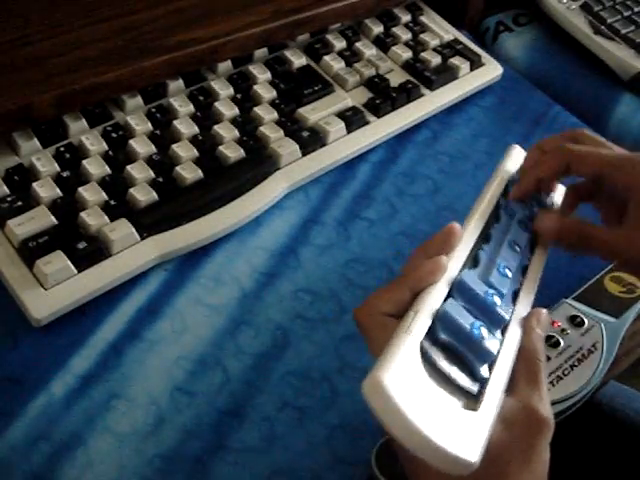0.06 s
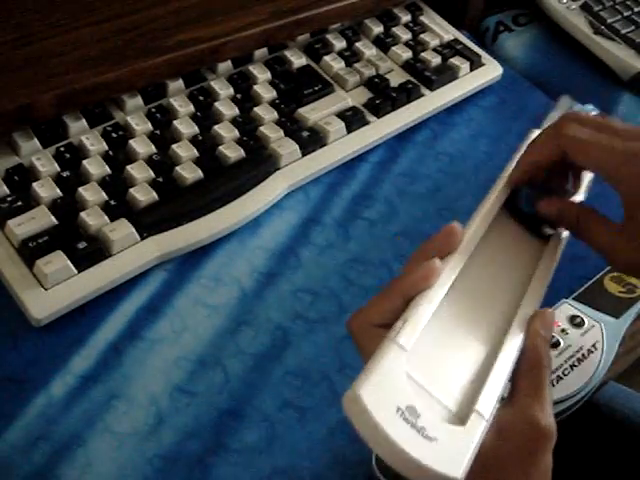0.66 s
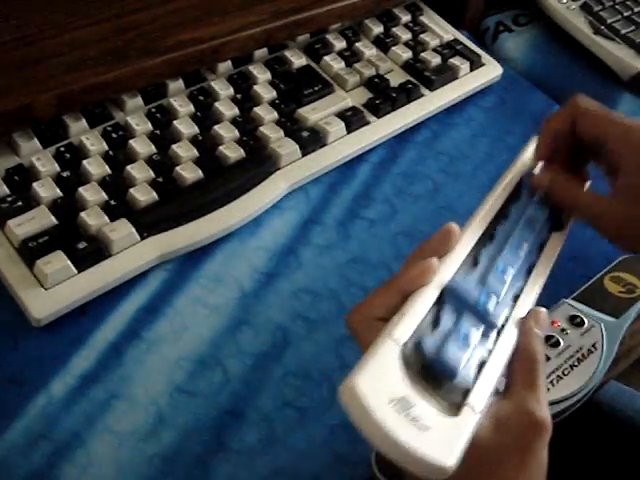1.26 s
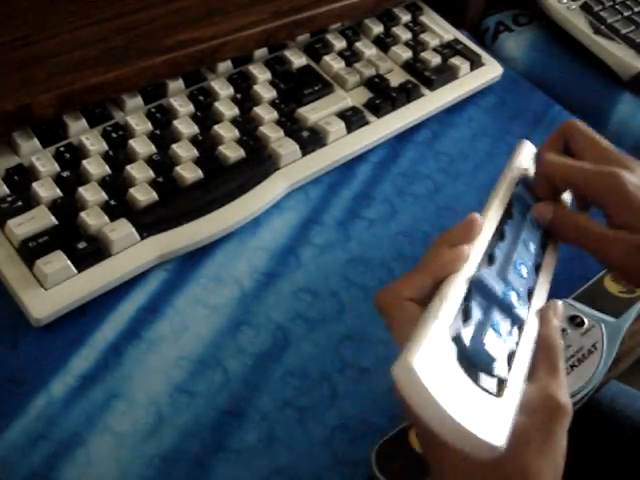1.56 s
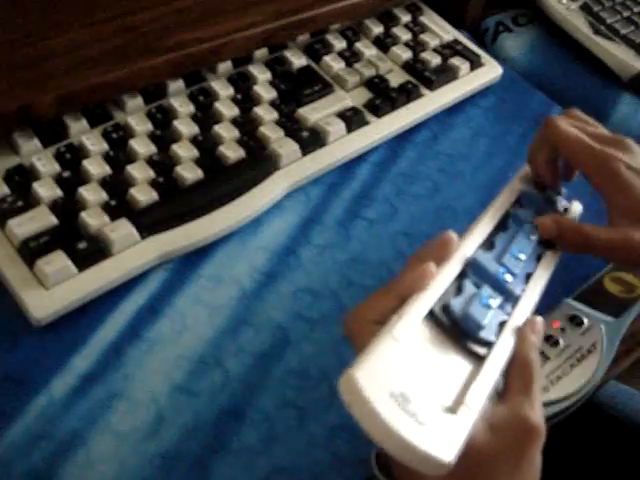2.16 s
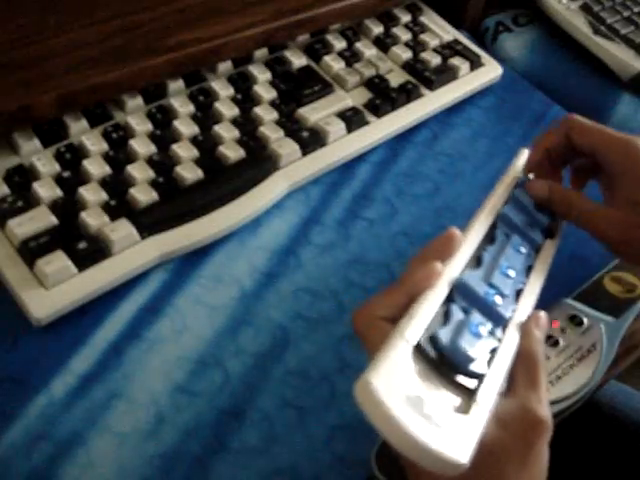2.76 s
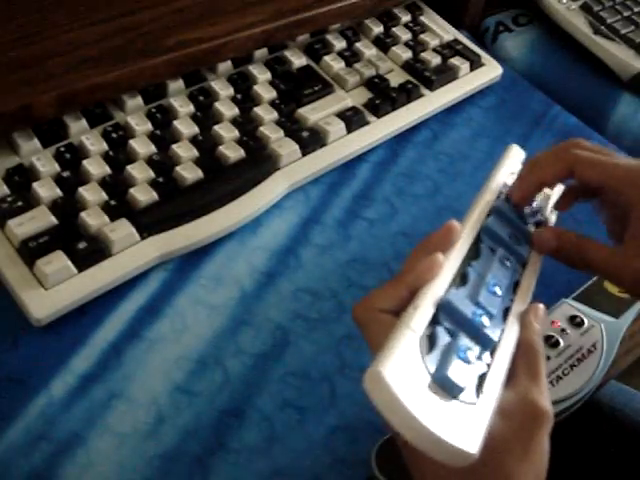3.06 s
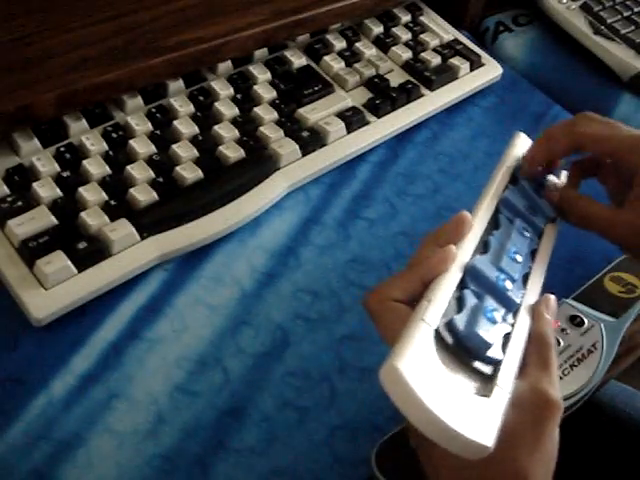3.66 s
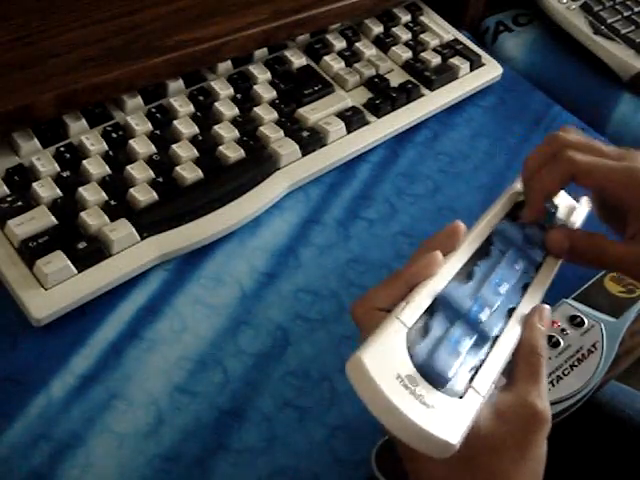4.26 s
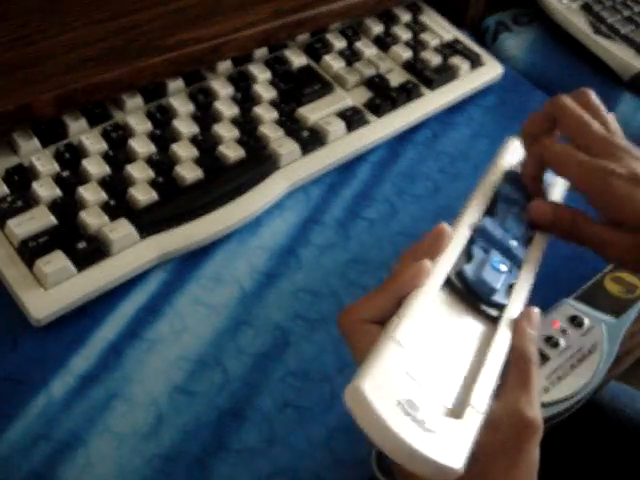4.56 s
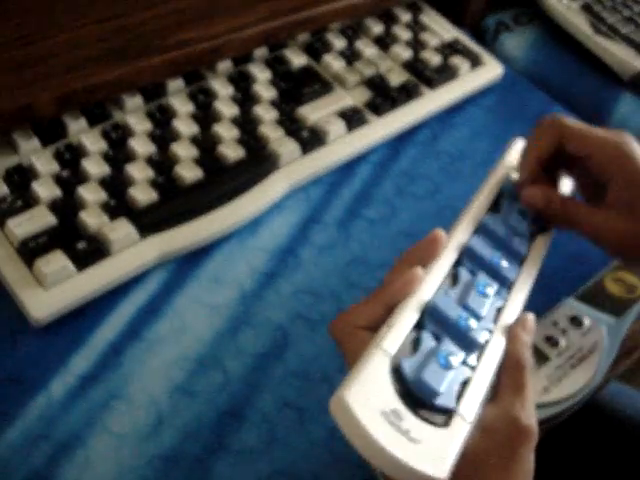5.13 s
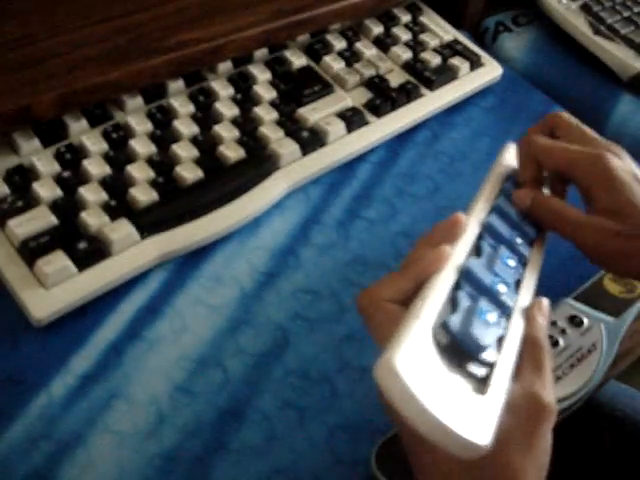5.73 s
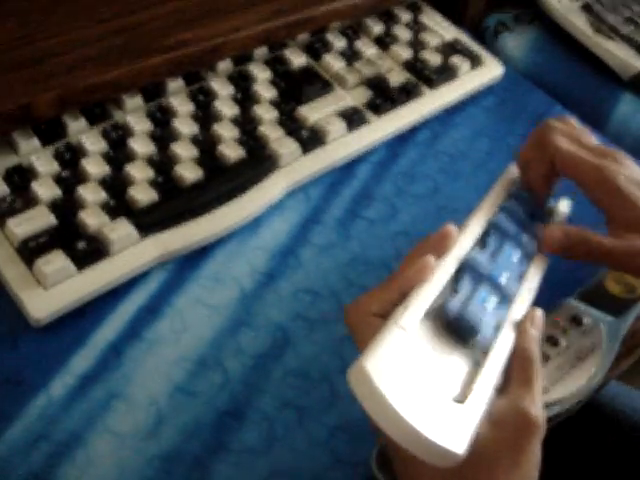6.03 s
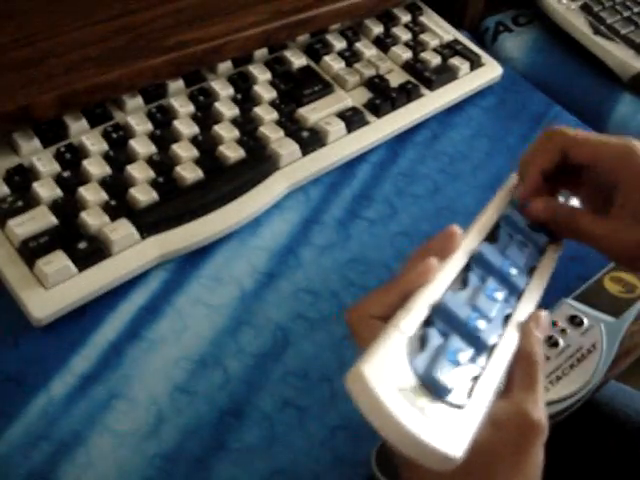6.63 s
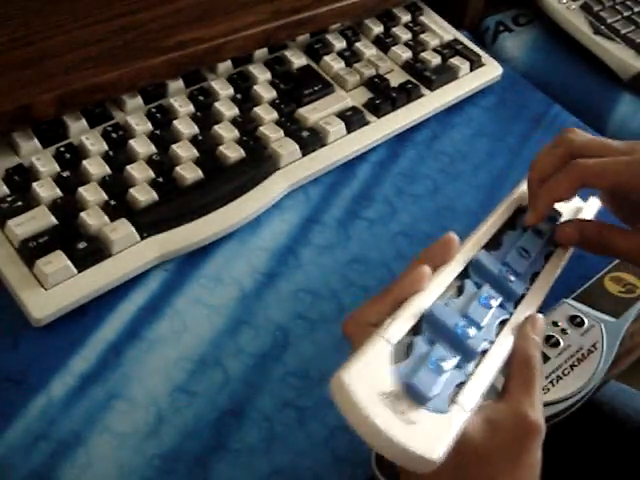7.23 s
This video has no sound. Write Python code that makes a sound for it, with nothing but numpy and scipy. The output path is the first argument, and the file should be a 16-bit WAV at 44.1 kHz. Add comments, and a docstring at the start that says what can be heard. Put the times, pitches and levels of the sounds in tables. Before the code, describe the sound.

A plastic sliding puzzle is worked by hand, close by in a small room, for about seven and a half seconds. Its knobs make quick, irregular clicks, each with a brief, fairly high, slightly hollow ring. The carrier rubs softly along its rails and strikes its end stops with harder, brighter clacks, slightly squashed and each carrying a small low thump.

Clicks and clacks start at once, with a short scrape near 0.8 seconds and further clacks around 1.2, 1.7 and from 2.2 to 2.9. From 3 to 4 seconds the clicking is lighter and sparser. A scrape and a loud cluster of clacks follow from 4.2 to 4.5. Busy clicking continues, with strong hits around 5.9 to 6.2, at 6.6 and near 7, and small clicks to the end. A short room echo trails the knocks, over faint low rumble, hiss and electric hum.

```python
"""At a desk in a small room, hands turn knobs and slide their carrier to and fro in a plastic puzzle case.
Each knock makes the case ring briefly. The carrier rubs along its rails and clacks against its end stops.
The room rings on behind it, over a low rumble, hiss and hum. A limiter (a fast automatic volume control)
squashes the hard clacks, so their tails stand out more; a low thump comes with each end-stop clack."""
import sys
import numpy as np
from scipy import signal
from scipy.fft import rfft
from scipy.io import wavfile
from scipy.ndimage import uniform_filter1d

SR = 44100
rng = np.random.default_rng(int(sys.argv[2]) if len(sys.argv) > 2 else 0)


def store_wav(level_fs):
    """Save 16-bit WAV to argv[1]."""
    pcm = np.round(np.clip(np.atleast_2d(level_fs), -1, 1) * 32767)
    wavfile.write(sys.argv[1], SR, pcm.T.astype(np.int16))


N = 325899

# Knobs and carrier knocking on the case. Each row: start in seconds, level in dB, ringing pitch in Hz,
# hollowness in dB (how far the middle pitches stand out), seconds to fade by 60 dB.
CLICKS = [(0.045, -36.5, 2430, 2, 0.032), (0.136, -27.0, 2520, 5, 0.059), (0.151, -24.5, 2540, 6, 0.042),
          (0.184, -20.0, 1720, -2, 0.035), (0.326, -18.0, 2570, 17, 0.031), (0.332, -16.0, 2520, 13, 0.017),
          (0.348, -25.5, 2480, 4, 0.036), (0.379, -22.0, 3100, 0, 0.02), (0.419, -23.0, 3100, -1, 0.05),
          (0.466, -30.5, 2520, 2, 0.049), (0.525, -29.5, 2520, 6, 0.031), (0.5604, -25.5, 2520, 4, 0.089),
          (0.575, -19.0, 2620, 2, 0.061), (0.612, -31.5, 2380, 2, 0.09), (0.629, -29.5, 4040, 5, 0.023),
          (0.7024, -23.0, 2440, 4, 0.049), (0.797, -20.5, 2220, 0, 0.025), (0.803, -25.5, 2190, 0, 0.034),
          (0.8225, -14.5, 3140, 3, 0.035), (0.833, -20.0, 2250, 15, 0.015), (0.839, -19.5, 3750, 1, 0.037),
          (0.862, -19.5, 3110, 1, 0.065), (0.881, -27.5, 3850, 1, 0.05), (1.0, -15.0, 2630, 2, 0.038),
          (1.028, -21.0, 2490, 4, 0.081), (1.08, -27.5, 3140, 3, 0.034), (1.2985, -17.0, 2530, 14, 0.042),
          (1.3414, -16.5, 2210, 4, 0.046), (1.499, -25.5, 2600, 2, 0.05), (1.557, -31.5, 2610, 4, 0.048),
          (1.595, -27.5, 2530, 4, 0.051), (1.63, -33.5, 2560, 5, 0.08), (1.944, -39.5, 1800, -3, 0.023),
          (2.0315, -21.5, 1920, 6, 0.025), (2.041, -23.0, 2560, 11, 0.017), (2.059, -19.0, 2530, 3, 0.043),
          (2.087, -23.0, 2390, 1, 0.063), (2.13, -21.5, 2470, 6, 0.029), (2.1369, -15.5, 2490, 15, 0.02),
          (2.35, -23.5, 1230, -1, 0.033), (2.357, -23.5, 2520, 0, 0.048), (2.491, -20.0, 1990, 6, 0.037),
          (2.583, -33.0, 1720, 3, 0.084), (2.611, -23.5, 2420, 12, 0.069), (2.7185, -22.5, 2550, 5, 0.026),
          (2.779, -19.5, 2950, 1, 0.012), (2.993, -33.0, 1730, -1, 0.05), (3.128, -20.5, 2260, 3, 0.079),
          (3.132, -18.5, 2310, 1, 0.039), (3.167, -27.5, 1750, -1, 0.045), (3.32, -34.0, 1800, -1, 0.025),
          (3.351, -27.0, 1820, -3, 0.02), (3.432, -30.0, 1990, 4, 0.028), (3.453, -30.5, 2260, 14, 0.025),
          (3.465, -33.0, 2540, 9, 0.031), (3.627, -26.5, 2490, 9, 0.042), (3.6765, -24.5, 2520, 7, 0.035),
          (3.699, -32.0, 2570, 15, 0.041), (3.729, -23.5, 2220, 3, 0.1), (3.993, -27.5, 2440, 2, 0.047),
          (4.0825, -30.5, 2490, 4, 0.049), (4.175, -27.0, 2210, 6, 0.077), (4.189, -17.0, 2540, 7, 0.04),
          (4.213, -24.0, 1580, -2, 0.06), (4.229, -24.5, 1530, -6, 0.05), (4.337, -13.0, 2500, 13, 0.047),
          (4.3443, -18.0, 1980, 6, 0.028), (4.349, -20.0, 1980, 3, 0.034), (4.458, -22.0, 2530, 8, 0.031),
          (4.472, -27.0, 2290, 1, 0.078), (4.499, -20.5, 3170, -1, 0.029), (4.54, -24.5, 3120, 1, 0.054),
          (4.561, -23.5, 3950, 0, 0.049), (4.607, -30.0, 2480, 1, 0.1), (4.774, -21.5, 2640, 7, 0.051),
          (4.842, -22.0, 2630, 0, 0.04), (4.8504, -19.0, 2620, 6, 0.066), (4.95, -15.5, 2400, 10, 0.031),
          (4.956, -21.0, 2540, 1, 0.11), (4.971, -24.0, 2420, 9, 0.019), (5.03, -32.0, 2570, 2, 0.022),
          (5.13, -26.0, 2210, 4, 0.06), (5.147, -17.5, 2270, 2, 0.067), (5.1685, -20.0, 2260, 10, 0.036),
          (5.176, -22.0, 2270, 8, 0.028), (5.305, -24.0, 2530, 4, 0.044), (5.413, -30.0, 3040, 3, 0.036),
          (5.444, -26.5, 3140, 5, 0.034), (5.468, -29.5, 2490, 7, 0.039), (5.486, -29.0, 2510, 5, 0.026),
          (5.552, -21.0, 2530, 3, 0.034), (5.839, -23.5, 2590, 8, 0.061), (5.858, -17.5, 2400, 7, 0.034),
          (5.877, -20.0, 1800, -3, 0.058), (5.986, -19.0, 2560, 9, 0.031), (5.991, -13.0, 2570, 9, 0.032),
          (6.0074, -23.5, 2560, 3, 0.048), (6.051, -16.5, 2520, 9, 0.019), (6.094, -11.0, 3140, 2, 0.041),
          (6.12, -20.5, 2480, 1, 0.031), (6.355, -26.0, 1270, 0, 0.035), (6.445, -34.0, 2400, 8, 0.045),
          (6.509, -22.5, 2610, 5, 0.051), (6.528, -19.5, 3390, -2, 0.049), (6.652, -23.5, 1600, 1, 0.04),
          (6.691, -22.5, 1950, 4, 0.02), (6.736, -20.0, 2400, 16, 0.041), (6.7434, -23.0, 2590, 14, 0.037),
          (6.808, -20.5, 2750, 8, 0.031), (6.857, -30.0, 2580, 16, 0.015), (6.905, -27.0, 2530, 3, 0.059),
          (6.938, -29.5, 2550, 2, 0.028), (6.95, -27.0, 2630, 6, 0.083), (6.9636, -19.5, 2550, 5, 0.031),
          (7.111, -18.0, 1980, 5, 0.018), (7.117, -19.5, 2280, 5, 0.032), (7.262, -28.5, 2000, 4, 0.053),
          (7.283, -20.5, 1340, 2, 0.041), (7.319, -24.5, 2700, 7, 0.023)]


def knob_clicks():
    """Lists the knocks of the knobs and carrier, adding a last column: 0 dB of extra treble."""
    return [(*click, 0) for click in CLICKS]


def loose_ticks(softer_db=-18, vary_db=2.5, hollow_db=3, fade_s=.025):
    """Lists the faint ticks of loose parts, one just after each click."""
    rows = []
    for start, db, ring_hz, _, _ in CLICKS:
        delay_s = rng.uniform(.004, .022)
        tick_db = db + softer_db + vary_db * rng.uniform(-1, 1)
        rows.append((start + delay_s, tick_db, ring_hz, hollow_db, fade_s, 0))
    return rows


# The carrier hitting its end stops. Each row: start in seconds, clack level in dB,
# ringing pitch in Hz, extra treble in dB, thump strength in dB.
STOPS = [(.1985, -13, 2960, 5, -26), (.3679, -11, 3150, 6, -30), (.4093, -15, 3100, 8, -32),
         (.7448, -17, 4150, 0, -32), (.7742, -16, 2550, 4, -41), (1.1699, -16, 2710, 1, -31),
         (1.6711, -10, 2300, -1, -30), (2.167, -12, 3150, 4, -31), (2.3337, -18.5, 2350, 4, -38),
         (2.4038, -10, 1720, 4, -25), (2.7631, -9, 1660, 5, -33), (2.8904, -18, 2530, 5, -37),
         (4.2191, -10, 1560, 6, -30), (4.3801, -8.5, 1270, 8, -23), (4.4888, -10, 3350, 10, -31),
         (5.0597, -17, 2780, 0, -40), (5.3502, -16, 2420, -1, -41), (5.888, -13, 3210, 5, -33),
         (6.1045, -16, 2380, 9, -37), (6.2041, -18.5, 1600, 6, -35), (6.578, -8.5, 3150, 8, -25),
         (6.7946, -15, 1610, 7, -41), (7.0062, -14, 1700, 0, -31), (7.1551, -16, 1600, 4, -42)]


def stop_clacks(hollow_db=-.2, fade_s=.039):
    """Lists the hard, bright knocks of the carrier against its end stops."""
    return [(start, db, hz, hollow_db, fade_s, treble_db) for start, db, hz, treble_db, _ in STOPS]


def stop_thumps(pulse_s=.00024, settle_s=.0067, settle_db=-3.5, rebound_s=.023, lag_s=.0004):
    """A low thump with each hard clack, as when a recorder is overloaded: one pulse, no ringing."""
    t, out = np.arange(SR // 5) / SR, np.zeros(N)
    spike = t / pulse_s * np.exp(1 - t / pulse_s)
    settling = gain_of(settle_db) * (1 - np.exp(-t / pulse_s)) * np.exp(-t / settle_s)
    pulse = spike + settling
    thump = (smooth(pulse, rebound_s) - pulse) / pulse.max()
    for start, *_, db in STOPS:
        add(out, start + lag_s, gain_of(db) * thump)
    return out


# The low, middle, upper and top pitch bands of a knock. Each row: lower edge in Hz, upper edge in Hz.
BANDS = [(900, 1900), (1900, 3000), (3000, 4800), (4800, 10500)]


def knock_tone(sound, db, ring_hz, hollow_db, treble_db):
    """Balances a knock's bands: small parts and hard blows are bright, hollow knocks favour the middle."""
    force_db = db + 22  # an ordinary click is at -22 dB and rings at 2500 Hz
    tilt_db = 2.6 + 6.2 * np.log2(ring_hz / 2500) + .24 * force_db  # upper band over low band
    top_db = -11 + .27 * tilt_db + .1 * force_db - .55 * hollow_db + treble_db
    wanted_db = np.array([-hollow_db - tilt_db / 2, 0, -hollow_db + tilt_db / 2, top_db])
    hz, power = np.fft.rfftfreq(len(sound), 1 / SR), abs(rfft(sound)) ** 2
    band_power = [power[(hz > low) & (hz < high)].sum() for low, high in BANDS]
    change_db = wanted_db - 10 * np.log10(band_power)
    centres_hz = np.sqrt(np.prod(BANDS, axis=1))
    return coloured(sound, list(zip(centres_hz, change_db - change_db.max())))


def knocks(rows, crack_db=-1, crack_s=.0007, rise_s=.00072, chatter_db=4, blow_s=.0061, size=4096):
    """Each knock cracks, then shakes the case. Returns the direct sound and the sound sent into the room."""
    t, out = np.arange(size) / SR, np.zeros((2, N))
    grain, flutter = np.moveaxis(rng.standard_normal((len(rows), 2, size)), 1, 0)
    fade_s = np.array([[fade] for *_, fade, _ in rows])
    chatter = gain_of(chatter_db * evened(uniform_filter1d(flutter, size=70, axis=1)))
    shaking = chatter * gain_of(-60 * t / fade_s)
    crack = gain_of(crack_db) * np.exp(-t / crack_s)
    envelope = (1 - np.exp(-t / rise_s)) * (shaking + crack)
    for (start, db, ring_hz, hollow_db, _, treble_db), burst in zip(rows, case(grain * envelope)):
        # The hollower the part, the more clearly it rings.
        ring = gain_of(4.5 + .65 * max(hollow_db, 0)) * resonate(burst, ring_hz, width_hz=340)
        # The ring is clearest straight from the open case, and weaker in what spreads round the room.
        for path, sound in zip(out, (burst + ring, burst + gain_of(-9) * ring)):
            knock = knock_tone(sound, db, ring_hz, hollow_db, treble_db)
            # Give it the energy of a steady sound at this level that lasts blow_s.
            add(path, start, gain_of(db) * np.sqrt(blow_s * SR) * knock / np.linalg.norm(knock))
    return out


# The broad tone of the plastic. Each row: frequency in Hz, boost or cut in dB.
PLASTIC_TONE = [(100, -29), (500, -20.5), (750, -16), (1000, -7), (1250, 0), (2500, 4), (5000, -2.5),
                (6500, -8), (8000, -13.5), (10000, -23)]
# The pitches at which the case rings. Each row: frequency in Hz, width in Hz, strength in dB.
CASE_RINGS = [(1315, 105, -0.5), (1590, 60, -6), (2234, 68, -6.5), (2500, 110, -12), (3160, 100, -10.5),
              (4930, 120, -10)]


def case(force):
    """The plastic colours every push it gets, and the case rings at its own pitches."""
    vibration = coloured(force, PLASTIC_TONE)
    return vibration + sum(gain_of(db) * resonate(vibration, hz, width) for hz, width, db in CASE_RINGS)


# The carrier rubbing along its rails. Each row: start in seconds, end in seconds, level midway in dB.
SLIDES = [(-.05, .13, -42), (.48, 0.677, -43), (0.743, 0.894, -34), (1.517, 1.66, -49), (3.59, 3.737, -45),
          (4.1, 4.18, -50.5), (4.186, 4.26, -28.5), (4.4, 4.586, -39), (4.658, 4.74, -55),
          (5.78, 5.85, -52), (6.59, 6.714, -37.5), (6.87, 7.0, -42.5), (7.2, 7.356, -49)]


def carrier_slides(slips_per_s=1000, vary_db=4, centre_hz=2400, width_hz=3200):
    """Plastic rubs on plastic in many tiny slips; each slide swells and dies away."""
    t, pressure = np.arange(N) / SR, np.zeros(N)
    for start, end, db in SLIDES:
        progress = np.clip((t - start) / (end - start), 0, 1)
        pressure += gain_of(db) * np.sqrt(np.sin(np.pi * progress).clip(0))
    slips = rng.standard_normal(N) * (rng.random(N) < slips_per_s / SR)
    slips *= gain_of(vary_db * rng.exponential(1, N).clip(0, 3))  # a few slips are much stronger
    rubbing = resonate(case(slips), centre_hz, width_hz)
    return pressure * evened(resonate(rubbing, centre_hz, width_hz))


# How long the room rings. Each row: frequency in Hz, seconds to fade by 60 dB.
ROOM_FADE = [(300, 0.02), (1300, 0.42), (3000, 0.4), (5000, 0.38), (9000, 0.21)]
# The tone of the room's echo. Each row: frequency in Hz, boost or cut in dB.
ROOM_TONE = [(300, -1.6), (1400, 0.5), (2400, -1.5), (3200, 0), (5000, -3), (7000, -0.5), (9000, 0.67)]


def room(sound, delay_s=.005, blend_hz=3, size=26000):
    """Many echoes blur into a tail in which each pitch fades at its own speed."""
    out, t = np.zeros(N), np.arange(N) / SR
    for k in range(3):
        hz, age_s, noise = signal.stft(rng.standard_normal(size), SR, nperseg=256)
        fade_db = read(ROOM_TONE, hz)[:, None] - 60 * age_s / read(ROOM_FADE, hz)[:, None]
        tail = signal.istft(noise * gain_of(fade_db), SR, nperseg=256)[1]
        # Blending steadily between three noise tails keeps the echo soft, without steady metallic tones.
        share = np.sqrt(2 / 3) * np.cos(2 * np.pi * blend_hz * t + k * np.pi / 3)
        add(out, delay_s, signal.fftconvolve(sound * share, tail / np.linalg.norm(tail)))
    return out


# The tones of the rumble and of the hiss. Each row: frequency in Hz, boost or cut in dB.
RUMBLE_TONE = [(20, -23), (80, -19), (140, -9), (230, -3), (380, -2.5), (560, 2), (750, -6.5), (1050, 1.5),
               (1500, -10.5), (3000, -32), (10000, -47)]
HISS_TONE = [(20, -13.5), (500, -4.5), (2500, -0.5), (4000, -5), (6000, -10.5), (8000, -13.5), (10000, -15)]
# The rumble's slow swells. Each row: time in seconds, level in dB before lift_db is added.
RUMBLE_SWELLS = [(0.0, -56), (0.47, -59), (0.99, -56), (1.11, -58), (1.58, -56), (1.75, -58), (1.95, -58),
                 (2.26, -54), (2.47, -57), (3.11, -58), (4.05, -50), (4.63, -56), (5.99, -52), (6.22, -55),
                 (6.98, -54), (7.08, -56), (7.39, -56)]
# The steady notes of the electric hum. Each row: frequency in Hz, level in dB.
HUM = [(120, -67.5), (302, -68), (344, -71.5)]


def background(lift_db=.7, hiss_db=-56):
    """A low rumble that swells and sinks, a faint hiss and an electric hum."""
    t = np.arange(N) / SR
    swell = gain_of(lift_db + np.interp(t, *np.transpose(RUMBLE_SWELLS)))
    rumble = swell * evened(coloured(rng.standard_normal(N), RUMBLE_TONE))
    hiss = gain_of(hiss_db) * evened(coloured(rng.standard_normal(N), HISS_TONE))
    hum = sum(gain_of(db) * np.sqrt(2) * np.sin(2 * np.pi * (hz * t + rng.random())) for hz, db in HUM)
    return rumble + hiss + hum


def gain_of(db):
    """Turns decibels (dB) into a number to multiply a sound by."""
    return 10 ** (np.asarray(db) / 20)


def evened(x):
    """Scales a signal to an average power of 1."""
    return x / np.sqrt(np.mean(x ** 2) + 1e-20)


def read(points, hz):
    """Looks up a frequency in a table, gliding between rows on a pitch scale."""
    row_hz, value = np.transpose(points)
    return np.interp(np.log(hz + 1), np.log(row_hz + 1), value)


def add(mix, start_s, sound):
    """Mixes a sound in at the given time."""
    part = mix[max(round(start_s * SR), 0):][:len(sound)]
    part += sound[:len(part)]


def coloured(x, points, size=4096):
    """Shapes a sound's tone by rows of Hz and dB, without smearing it earlier in time."""
    log_gain = np.log(gain_of(read(points, abs(np.fft.fftfreq(size, 1 / SR)))))
    response = np.exp(np.conj(signal.hilbert(log_gain)))
    taps = np.fft.ifft(response).real[:size // 2]
    return signal.fftconvolve(np.atleast_2d(x), taps[None], axes=1)[:, :x.shape[-1]].reshape(x.shape)


def resonate(x, hz, width_hz):
    """Keeps the pitches around hz; a narrower width rings longer."""
    r = np.exp(-np.pi * width_hz / SR)
    return signal.lfilter([1 - r, 0, r - 1], [1, -2 * r * np.cos(2 * np.pi * hz / SR), r * r], x)


def smooth(x, seconds):
    """Follows a signal with a lag, rounding off quick changes."""
    r = np.exp(-1 / (seconds * SR))
    return signal.lfilter([1 - r], [1, -r], x)


def scene(room_db=-12):
    """The puzzle's knocks and slides, their echo in the room, and the background."""
    direct, into_room = knocks(knob_clicks() + stop_clacks() + loose_ticks()) + carrier_slides()
    return (direct + gain_of(room_db) * room(into_room) + background())[None]


def record(dry, limit_db=-16.5, squash=.96, release_db_per_s=650, ceiling=.4, top_hz=10250):
    """Turns loud clacks down, rounds their peaks, adds the thumps unsquashed and cuts the highest treble."""
    sound = dry[0]
    level_db = 10 * np.log10(smooth(sound ** 2, seconds=.00087) + 1e-12)
    over_db = np.maximum(level_db - limit_db, 0)
    # The limiter turns down almost at once, then lets go at a steady rate.
    release_db = np.arange(N) * release_db_per_s / SR
    held_db = np.maximum.accumulate(over_db + release_db) - release_db
    cut_db = smooth(squash * held_db, seconds=.000084)
    limited = ceiling * np.tanh(sound * gain_of(-cut_db) / ceiling)
    treble_cut = signal.firwin(255, top_hz, window=("kaiser", 9), fs=SR)
    return signal.oaconvolve(limited + stop_thumps(), treble_cut, "same")[None]


dry = scene()
out = record(dry)
store_wav(out)
```